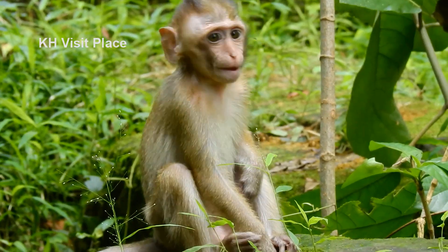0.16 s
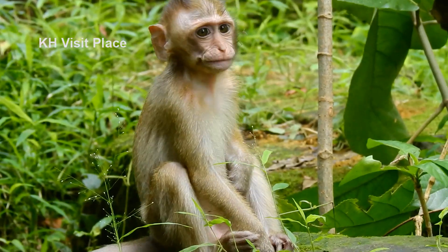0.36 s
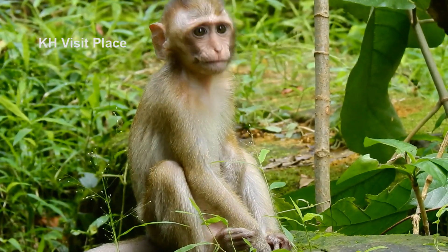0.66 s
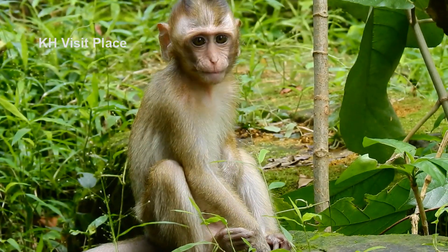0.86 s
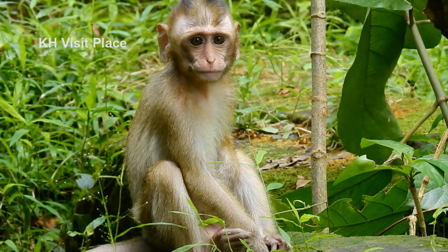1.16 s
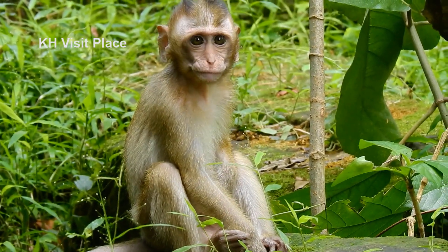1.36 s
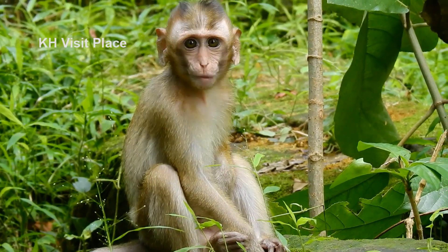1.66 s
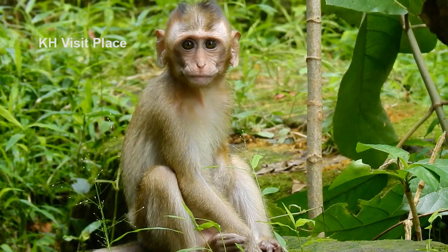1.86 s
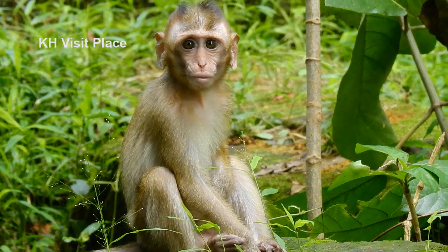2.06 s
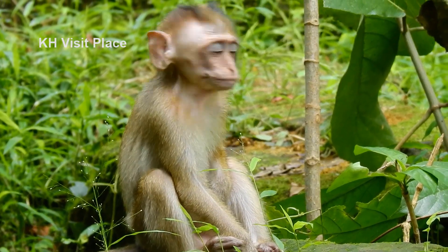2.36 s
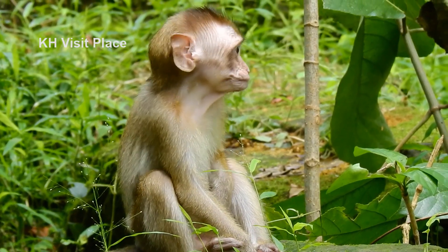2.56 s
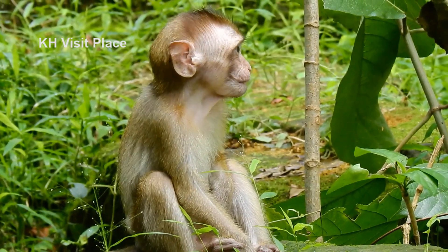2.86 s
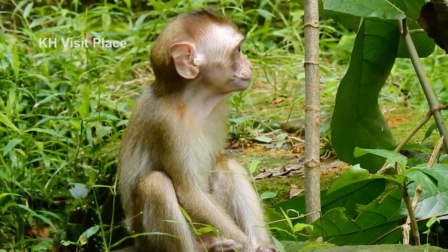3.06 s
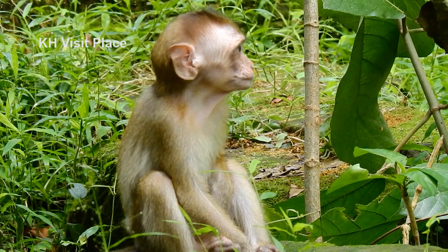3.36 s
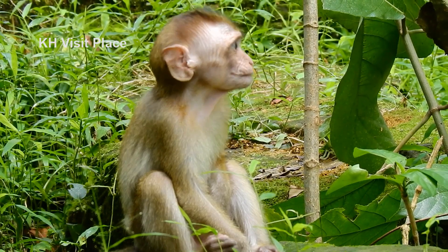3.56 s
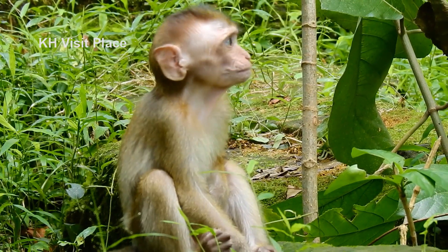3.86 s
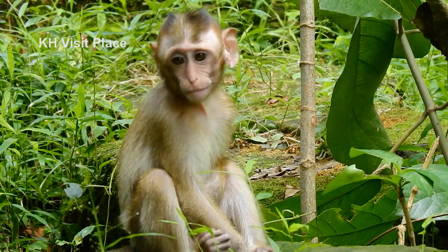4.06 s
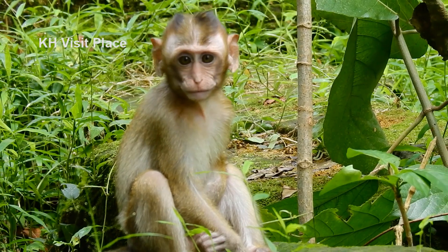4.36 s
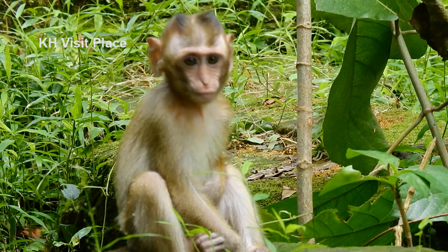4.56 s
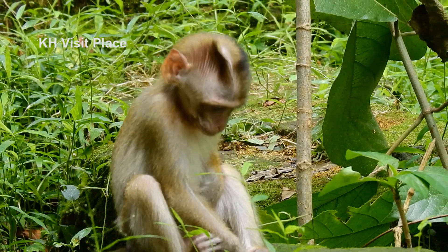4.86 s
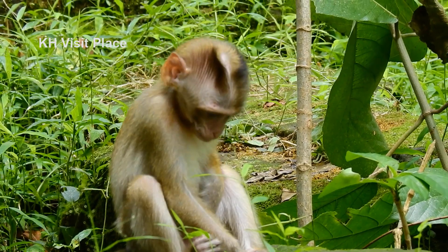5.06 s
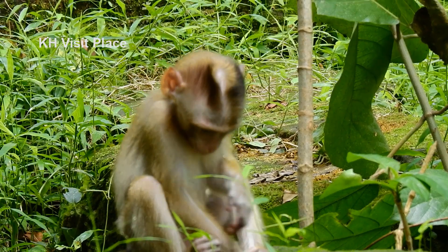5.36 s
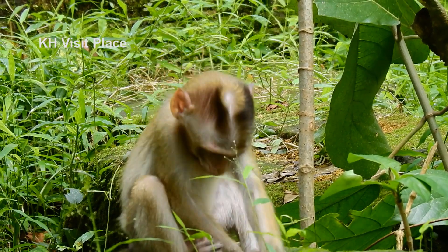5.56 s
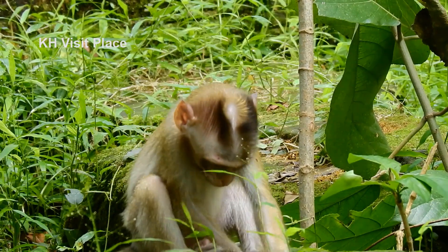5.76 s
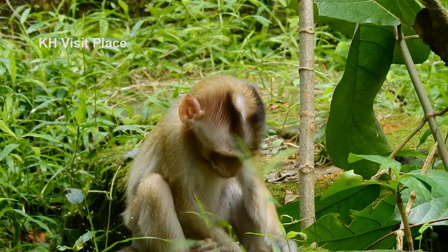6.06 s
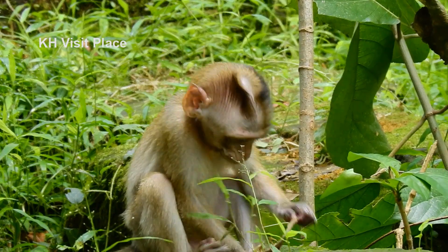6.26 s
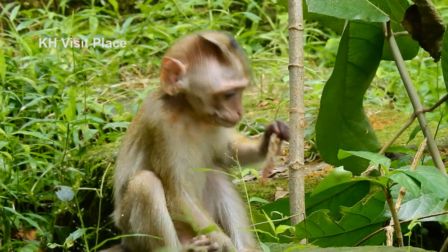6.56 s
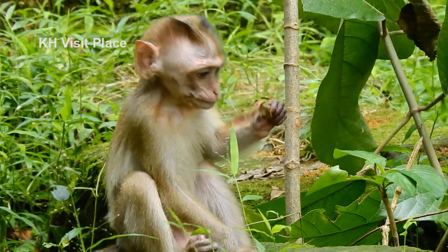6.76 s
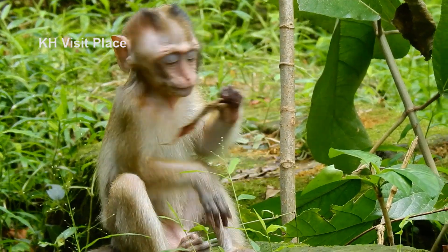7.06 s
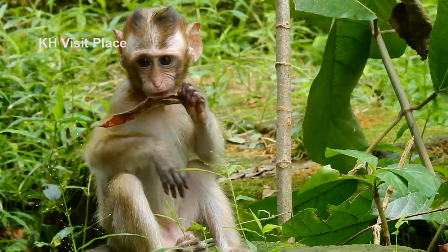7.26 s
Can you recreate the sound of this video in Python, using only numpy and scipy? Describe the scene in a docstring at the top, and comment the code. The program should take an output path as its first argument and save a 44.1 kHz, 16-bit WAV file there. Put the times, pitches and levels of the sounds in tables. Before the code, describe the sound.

Stereo camera microphone in a leafy forest clearing where a young monkey sits. A far bird gives hollow, rising strings of short whistled coos with soft woodland echoes, then repeats an octave higher. A katydid rasps very high on the left throughout. Twigs crack close by around one second, with soft thuds and rustling leaves. Faint crickets and small chirps fill in over low, distant rumble.

```python
"""A far bird's coo, already sounding, opens this forest clearing, with a katydid's rasp in threes to the left and leaves
rustling. The bird whistles rising strings of short notes, then an octave higher; small birds chirp in glides over
faint low coos, crickets trill in pulsed tones, and echoes of decaying noise answer them all. A creak, soft thuds
and leaves are filtered noise, twigs snap close by in a few sagging cycles, distant rumble throbs and a low tone
swells near the end. The forest bed is noise shaped band by band; a stereo camera microphone limits bass and top."""
import sys
import numpy as np
from scipy import signal
from scipy.fft import irfft, next_fast_len
from scipy.io import wavfile
from scipy.ndimage import uniform_filter1d, map_coordinates

SR = 44100
rng = np.random.default_rng(int(sys.argv[2]) if len(sys.argv) > 2 else 0)


def master(y):
    """Save y as 16-bit WAV."""
    cut = np.clip(np.atleast_2d(y).T, -1, 1)
    pcm = np.round(cut * 32767)  # scale
    wavfile.write(sys.argv[1], SR, pcm.astype(np.int16))


N = 326781
T = np.arange(N) / SR  # seconds

# Placed sounds take their level in dB from the mean of the left and right ports.
# Air of the clearing. Each row: time in seconds, levels in dB of the rumble, the low middle and the leaf
# rustle; each moves the bed by its departure from its own median.
AIR_LEVELS = [(0.0, -42.5, -54.5, -47), (0.2, -45.5, -49, -53), (0.6, -50, -56.5, -62),
              (0.95, -41.5, -53, -47.5), (1.19, -52, -55, -54), (1.67, -49.5, -50, -57.5),
              (2.25, -48, -57, -60.5), (2.85, -48.5, -54, -57.5), (3.63, -45.5, -54, -60.5),
              (4.33, -45, -54.5, -56.5), (4.68, -48.5, -50.5, -56.5), (4.87, -39, -53.5, -58),
              (4.91, -48.5, -53, -58.5), (5.66, -49, -56.5, -56.5), (5.94, -48, -50, -53.5),
              (6.31, -53, -56, -56.5), (6.69, -54.5, -53, -55.5), (6.93, -45, -55.5, -55.5),
              (7.41, -48.5, -49, -57)]
# Colour of the forest bed. Each row: frequency in Hz, relative density in dB per Hz.
FOREST_COLOUR = [(12, -48.5), (20, -14), (76, 3), (132, -5.5), (187, -8), (344, -14.5), (687, -20),
                 (827, -21.5), (1570, -26.5), (1890, -24), (3970, -29), (4910, -29.5), (7320, -29),
                 (9800, -38.5), (11500, -61), (15000, -58), (22000, -120)]
# Width of the bed at the microphone. Each row: frequency in Hz, left-right likeness from 0 to 1.
LIKENESS = [(60, 0.98), (250, 0.95), (700, 0.55), (1500, 0.33), (8000, 0.12)]
FOREST_RMS_DB, FLICKER_DB = -43.5, 3.0
RUMBLE_TOP_HZ, MURMUR_HZ, MURMUR_OCTAVES, LEAVES_FROM_HZ = 158, 257, 1.2, 1470

# Katydid off to the left. Each row: time in seconds, left level in dB, left minus right in dB.
KATYDID_LEVELS = [(0, -37.5, 8), (.4, -41.5, 12), (1.199, -38.5, 11), (1.65, -39.5, 19), (2.1, -38, 8),
                  (3.6, -39, 12), (4.1, -37.5, 15), (6.201, -37.5, 8), (6.7, -40, 10), (7.41, -41, 9.5)]
# Resonances of its wing. Each row: centre in Hz, width in Hz, relative level in dB.
WING_RESONANCES = [(12185, 1750, -11.5), (13440, 930, -8), (14600, 960, -1), (16120, 1700, 2)]
# Drift of its rhythm. Each row: time in seconds, lead over the steady beat in trios.
RHYTHM_LEAD = [(.15, .06), (.6, .1), (1.65, -.1), (2.55, -.09), (3.15, -.21), (3.75, -.17), (4.05, -.21),
               (5.25, -.07), (6.45, .17), (7.05, .17)]
# The three strokes of a trio. Each entry: relative level in dB.
STROKE_LEVELS = [-4.5, -2, -2.5]
TRIOS_A_SECOND = 18.9
STROKE_WIDTH, BETWEEN_DB = 0.068, -9.5  # width in trios; relative blur between strokes
KATYDID_LAG, KATYDID_ALIKE = 50, 0.5  # samples later at the right port; share common to both

# Leaves and stalks brushed, and a short creak just before the first snap. Each row: start in seconds,
# rms in dB at the burst's peak, centre in Hz, rise in seconds, fall by 60 dB in seconds.
BRUSH_BURSTS = [(0, -44.5, 5870, 0.018, 0.86), (.89, -44, 1500, 0.044, 0.22),
                (1.40, -55.5, 6740, 0.043, 0.4), (1.89, -54, 6400, 0.047, 0.82),
                (2.38, -56.5, 6240, 0.03, 0.6), (3.84, -54.5, 2730, .035, 0.39),
                (4.765, -50, 1280, 0.038, 0.29), (5.80, -48, 1340, 0.02, 0.16),
                (6.10, -53, 990, 0.036, 0.31), (6.339, -56.5, 5330, 0.046, 1.3),
                (6.653, -46.5, 833, .1, 0.05), (7.23, -59.5, 2300, .03, 0.25)]
# Soft low bursts: thuds, and the body of the second twig snap. Each row: start in seconds,
# rms in dB at the burst's peak, centre in Hz.
LOW_BURSTS = [(1.325, -40.5, 740), (1.359, -38, 263), (1.669, -40.5, 196), (2.37, -42.5, 199),
              (2.56, -39.5, 151), (2.64, -39.5, 184), (2.901, -43, 198), (4.401, -46.5, 370),
              (4.47, -42, 211)]
BRUSH_OCTAVES, LOW_OCTAVES = 0.7, 0.77
LOW_RISE_S, LOW_T60_S = 0.014, 0.17

# Far bird: its notes and their strongest echoes as they arrive. Each row: centre in seconds (a third of
# the way in for the first of a high string), peak in dB, nominal pitch in Hz, length in seconds,
# left minus right in dB.
COO_ARRIVALS = [(.022, -34.5, 931.7, 0.11, 4), (0.107, -38.5, 929, 0.063, 12), (0.177, -40, 892, 0.046, -1),
                (0.652, -34.5, 896, 0.078, 12), (0.756, -29, 895, 0.067, 8), (0.851, -34, 895, 0.075, 4),
                (.903, -33.5, 906, .05, 1), (.958, -27, 919, .055, 9), (.997, -32, 910.6, .045, 6),
                (1.051, -30, 912.6, 0.038, -3), (1.13, -41, 914, 0.072, -4), (1.18, -48, 903, 0.048, 7),
                (1.24, -50, 938, 0.055, -5), (1.695, -34.5, 895, 0.076, -3), (1.755, -41, 866, .04, -5),
                (1.798, -30, 897, 0.067, -7), (1.893, -28, 915.6, .075, -5), (1.948, -31.5, 918, 0.034, 3),
                (1.974, -29, 911.4, 0.039, 4), (1.995, -29, 910, 0.029, 7), (2.05, -37, 930, 0.049, 6),
                (2.115, -33, 927, .028, 17), (2.143, -36, 927, 0.035, 27), (2.215, -44, 916, 0.052, -5),
                (2.295, -52.5, 919, 0.053, -2), (2.745, -41.5, 870, 0.059, 7.5),
                (2.868, -31.5, 888, 0.0877, -1), (2.966, -29.5, 902, 0.068, -2),
                (3.066, -28, 899.3, .075, -2), (3.142, -33, 885, 0.033, 0), (3.174, -32, 897, 0.039, 4),
                (3.256, -42, 904, .045, 2), (3.294, -41.5, 895, 0.034, 2), (3.852, -41, 870, .07, 2),
                (3.925, -46.5, 856, .03, 3), (3.966, -30.5, 876, 0.062, 0),
                (4.062, -32.5, 894.5, 0.063, -5), (4.135, -42, 897, 0.03, 1), (4.169, -34, 912, 0.071, -2),
                (4.252, -36.5, 908.5, 0.06, -3), (4.379, -48, 893, 0.079, 2),
                (5.061, -35.5, 1800, 0.073, 9), (5.116, -37, 1817, 0.028, 9.5),
                (5.145, -45, 1800, .025, -1), (5.178, -40.5, 1790, 0.048, 4), (5.227, -30, 1803, .038, 5),
                (5.27, -35, 1812, 0.044, 1), (5.305, -47, 1786, .035, 3), (5.342, -38, 1830, 0.033, 12),
                (5.382, -39, 1814, 0.056, 14.5), (5.422, -42, 1810, 0.051, 10.5),
                (5.511, -45, 1810, 0.036, 3), (5.585, -47, 1800, 0.059, 3), (5.66, -49.5, 1800, .07, 7),
                (5.843, -28, 1805, 0.096, 19.5), (5.915, -45, 1780, .035, 9),
                (5.952, -37.5, 1766, 0.025, 11.5), (5.998, -40, 1784, .04, 10.5),
                (6.03, -25, 1838, 0.04, 4), (6.054, -36, 1904, .02, 9), (6.072, -27, 1841, 0.026, -3),
                (6.1, -31, 1880, 0.032, 17), (6.124, -30.5, 1840, 0.02345, 5),
                (6.154, -41, 1863, 0.036, 12), (6.207, -51, 1895, .03, 8), (6.31, -51, 1836, 0.033, 5.5),
                (6.365, -44, 1833, 0.028, 10)]
# Further echoes off the nearest trunks. Each row: delay in seconds, level in dB relative to the arrival,
# left minus right in dB, half the phase step between the ports in radians.
TRUNK_ECHOES = [(0.044, -8.5, 2.5, 0.5), (.14, -20, -6, -.3)]
COO_LAG = -0.7  # half the phase step between the ports for each arrival, radians
# shares of the nominal pitch: start, end, extra scoop on a first note, midway bow, rms waver
COO_FROM, COO_TO, FIRST_SCOOP, COO_ARCH, COO_WAVER = 0.94, 0.98, 0.0372, 0.0396, 0.015
PAUSE_S, HIGH_FROM_HZ = 0.25, 1300  # a longer gap opens a new string; strings above this open abruptly

# Chirps of small birds, some of their ringing echoes, and faint low coos near 620 Hz. Each row: start in
# seconds, peak in dB, first Hz, last Hz, length in seconds, left minus right in dB.
BIRD_CALLS = [(.005, -49.5, 3010, 2970, 0.087, 21), (0.096, -49.5, 2826, 2725, 0.098, 1),
              (0.163, -49.5, 2530, 2390, 0.04, -1.5), (0.196, -46.5, 6800, 5850, 0.054, 2),
              (0.79, -47.5, 619, 564, 0.24, -3), (0.961, -41, 3640, 3730, 0.021, -3),
              (1.213, -48, 3780, 3400, 0.06, -12), (1.315, -46.5, 4500, 4310, 0.058, -21),
              (1.481, -49, 4610, 4700, 0.041, -2), (1.52, -53, 4680, 5050, .028, 15),
              (3.041, -51.5, 622, 615, 0.19, -1), (3.142, -62, 3040, 3140, 0.19, 0),
              (3.585, -54, 2150, 2220, 0.033, 7), (3.545, -56, 6580, 6340, 0.083, 8.5),
              (4.51, -51, 2150, 2640, 0.036, 13), (4.536, -37.5, 2704, 2540, 0.039, -2),
              (4.569, -53, 2420, 2330, 0.15, 1), (4.573, -44, 2410, 1860, 0.037, 9),
              (4.768, -50, 2600, 2600, 0.033, -9), (4.784, -40, 2090, 2170, 0.021, 14),
              (4.799, -46, 1760, 1300, 0.024, 2), (4.802, -32.5, 2030, 2252, 0.036, 22),
              (4.84, -50.5, 2130, 2028, 0.24, 21), (4.928, -59, 620, 618, 0.28, -1),
              (5.199, -56, 624.2, 620, 0.43, -12), (5.27, -57, 3680, 3510, 0.14, 1),
              (5.327, -45, 2080, 2214, 0.0176, 8), (5.253, -52.5, 4480, 4540, 0.25, -15),
              (5.455, -47.5, 6600, 5920, 0.05, 19), (5.533, -44.5, 2440, 2800, 0.028, -5),
              (5.596, -39, 1944, 2245, 0.0266, 29), (5.62, -30, 2090, 2253, 0.026, 26),
              (5.7, -50, 2219, 2220, 0.047, 21), (5.582, -48.5, 1740, 1620, 0.084, 10),
              (5.768, -53, 5400, 5200, 0.019, 20), (5.812, -42.5, 1535, 1395, 0.032, 5),
              (5.824, -44, 1180, 1090, 0.024, 5), (5.825, -50, 5340, 5270, 0.0247, 5.5),
              (5.919, -39.5, 5150, 3470, 0.015, -6), (5.929, -48.5, 3640, 3440, 0.032, -7),
              (6.017, -53.5, 3560, 3870, 0.053, -13), (6.072, -55.5, 4730, 4600, .06, -5),
              (6.124, -53, 3700, 3720, 0.042, -9.5), (6.147, -57.5, 4050, 3880, .07, -14),
              (6.137, -46.5, 1963, 1997, 0.089, 4), (6.595, -58, 1720, 1690, .05, 3.5),
              (6.634, -55, 1950, 2370, 0.041, 7), (6.67, -59, 2300, 2350, .04, 6),
              (6.94, -54, 2290, 2260, .035, 5), (7.013, -65, 1940, 1900, 0.031, 7),
              (7.106, -52, 1964, 1840, 0.036, 14), (7.238, -50, 2490, 2640, .03, 5),
              (7.27, -56, 2110, 2040, 0.094, 9), (7.233, -52.5, 6190, 6120, 0.092, 0.5)]
# Reverberation: fall by 60 dB and rise in seconds, and the level sent into it in dB
TREES_T60_S, TREES_RISE_S, COO_ECHO_DB, SNAP_ECHO_DB = 0.96, 0.012, -5.5, -28
BUSHES_T60_S, BUSHES_RISE_S, BUSHES_DB = 0.45, 0.0012, -2.5

# Crickets. Each row: start in seconds, level in dB before pulsing, pitch in Hz, length in seconds,
# pulses a second, left minus right in dB.
CRICKET_TRILLS = [(0.235, -46.5, 6380, 0.13, 65, 3), (0.194, -51.5, 4915, 0.44, 36, 1.5),
                  (1.142, -59, 9100, 0.25, 55, 3.5), (2.91, -56.5, 4950, 0.3, 33, -1.5),
                  (3.113, -60.5, 7150, 0.324, 35, -2.5), (3.527, -55.5, 9600, 0.12, 58, 0),
                  (3.559, -58.5, 6250, 0.2, 59, 37), (4.084, -51, 2590, 0.38, 35, -5),
                  (4.249, -54, 4980, 0.64, 35.2, 3), (5.096, -46.5, 2570, 0.28, 39, -6),
                  (5.466, -52.5, 6450, 0.25, 68, 13), (6.482, -51, 4950, 0.53, 48, -3),
                  (7.263, -48, 6340, 0.14, 63, 9)]

# Twigs close by. Each row: start in seconds, peak in dB, first Hz, last Hz, swell in seconds,
# tick rms at its onset in dB, tick Hz, left minus right in dB, splinter reference level in dB.
TWIG_SNAPS = [(.9336, -10, 1580, 1050, .0011, -27, 3500, -1, -32),
              (1.3398, -29, 1050, 900, .0008, -48, 2200, -1, -52),
              (1.3482, -15.5, 1030, 930, .0008, -39, 2500, -1, -43),
              (1.3691, -13.5, 880, 600, .0006, -37, 3200, 0, -45),
              (1.4862, -46, 1800, 1800, .0004, -34.5, 7600, -2, -60)]
# Splinters after each snap. Each row: share of the snap's first Hz, level in dB relative to its splinter
# reference, width in octaves, rise in seconds, fall by 60 dB in seconds.
SPLINTER_BURSTS = [(0.381, 8, 1.2, 0.00067, 0.068), (1.0, -3, 1.8, 0.00058, 0.15),
                   (3.2, -12, 0.68, 0.0016, 0.38)]
SNAP_SAG_S, SNAP_FADE_S, TICK_FADE_S = 0.001, 0.0013, 0.0012

# Low throbs in the distant rumble, like a far motor under load. Each row: centre in seconds, peak in dB, Hz.
RUMBLE_THROBS = [(3.22, -37, 130), (3.347, -35, 120), (3.39, -36.5, 110), (3.433, -32, 111),
                 (3.482, -31, 115), (3.525, -29, 126), (3.574, -29.5, 120), (3.621, -35, 111),
                 (3.716, -36, 110), (3.857, -31, 125), (3.987, -34, 105), (4.015, -31, 120),
                 (4.305, -37, 110), (4.852, -30, 95), (4.876, -37, 110)]
THROB_CYCLES = 0.48  # from the centre until the swell has fallen to 1/e
# Low hum near the end. One row: start in seconds, peak in dB, pitch in Hz, length in seconds.
LOW_HUM = (7, -46, 200, 1.9)

MIC_LOW_HZ, MIC_TOP_HZ = 42.3, 15780


def undb(db):
    """Decibels to amplitude."""
    return 10 ** (np.asarray(db) / 20)


def unit(x):
    """Scales to rms 1."""
    return x / np.sqrt(np.mean(x ** 2))


def walk(rate):
    """Random levels held 1 / rate s and smoothed twice, rms 1."""
    hold = int(SR / rate)
    steps = np.repeat(rng.standard_normal(N // hold + 1), hold)
    return unit(uniform_filter1d(uniform_filter1d(steps, hold), hold)[:N])


def band(hz, width_hz):
    """Two unrelated noises in a bell-shaped band, rms 1."""
    size = next_fast_len(N)
    bell = np.exp(-2 * ((np.fft.rfftfreq(size, 1 / SR) - hz) / width_hz) ** 2)
    real, imaginary = rng.standard_normal((2, 2, len(bell)))
    return unit(irfft(bell * (real + 1j * imaginary), size)[:, :N])


def bandpass(order, low_hz, high_hz, x):
    """Butterworth band-pass."""
    return signal.sosfilt(signal.butter(order, [low_hz, high_hz], "band", fs=SR, output="sos"), x)


def decay(t, t60):
    """Exponential fall by 60 dB in t60 seconds."""
    return np.exp(-np.log(1000) * t / t60)


def along_pitch(hz, table):
    """Reads a table of (Hz, value) on a logarithmic frequency axis."""
    table_hz, values = np.transpose(table)
    return np.interp(np.log(hz), np.log(table_hz), values)


def add(out, s, sound, db, pan_db, lag=0.):
    """Places an analytic sound between left and right; lag is half the phase step between the ports."""
    first = int(s * SR)
    i = max(first, 0)
    sound = sound[i - first:][:N - i]
    gains = undb(np.array([[pan_db], [-pan_db]]) / 2)
    ports = gains * np.exp(1j * lag * np.array([[1], [-1]]))
    out[:, i:i + len(sound)] += np.real(sound * ports) * undb(db) / abs(ports.mean())


def whistle(first_hz, last_hz, length, blur_hz=0., skew=0.58, arch_hz=0., edge=1.4):
    """A gliding, bowing, wavering note; skew under 1 quickens the attack, a small edge holds the level."""
    u = (np.arange(int(length * SR)) / (length * SR)) ** skew
    noise = rng.standard_normal(len(u))
    waver = blur_hz * unit(uniform_filter1d(uniform_filter1d(noise, size=90), size=90))
    arch = np.sin(np.pi * u)
    hz = first_hz + (last_hz - first_hz) * u + arch_hz * arch + waver
    return arch ** edge * np.exp(2j * np.pi * np.cumsum(hz) / SR)


def forest():
    """Noise whose third-octave bands flicker alone; bass, low middle and treble follow their own levels."""
    frames = dict(nperseg=2048, noverlap=1536)
    hz, t, (mid, side) = signal.stft(rng.standard_normal((2, N)), SR, **frames)
    hz = np.maximum(hz, 10)[:, None]
    s, *levels = np.transpose(AIR_LEVELS)
    rumble, murmur, leaves = [np.interp(t, s, level - np.median(level)) for level in levels]
    db = along_pitch(hz, FOREST_COLOUR)
    db = db + rumble / (1 + (hz / RUMBLE_TOP_HZ) ** 4)
    db = db + murmur * np.exp(-(np.log2(hz / MURMUR_HZ) / MURMUR_OCTAVES) ** 2)
    db = db + leaves / (1 + (LEAVES_FROM_HZ / hz) ** 2)
    # random levels on a grid of third octaves and eighths of a second
    patches = rng.standard_normal((40, 80))
    grid = np.broadcast_arrays(3 * np.log2(hz / 10), 8 * t)
    flicker = map_coordinates(patches, grid, order=1)
    alike = np.clip(along_pitch(hz, LIKENESS), 0, 1)
    signs = np.array([1, -1])[:, None, None]
    both = np.sqrt(1 + alike) * mid + np.sqrt(1 - alike) * side * signs
    out = signal.istft(both * undb(db + FLICKER_DB * flicker), SR, **frames)[1][:, :N]
    return unit(out) * undb(FOREST_RMS_DB)


def katydid():
    """Three wing strokes and a rest; each stroke is a noisy rasp through the wing's resonances."""
    s, level_db, pan_db = np.transpose(KATYDID_LEVELS)
    beat = TRIOS_A_SECOND * T + np.interp(T, *np.transpose(RHYTHM_LEAD))
    # every stroke varies in force by about 1 dB
    force = undb(1.0 * rng.standard_normal((int(beat.max()) + 2, 3)))[beat.astype(int)]
    power = undb(2 * BETWEEN_DB)
    for k, db in enumerate(STROKE_LEVELS):
        stroke = np.exp(-((beat % 1 - (k + 1) / 4) / STROKE_WIDTH) ** 2)
        power = power + undb(2 * db) * force[:, k] ** 2 * stroke
    rasp = sum(undb(db + walk(13)) * band(hz, width_hz) for hz, width_hz, db in WING_RESONANCES)
    common = np.roll(rasp[0], KATYDID_LAG)
    rasp[1] = KATYDID_ALIKE * common + np.sqrt(1 - KATYDID_ALIKE ** 2) * rasp[1]
    right_db = np.outer([0, -1], np.interp(T, s, pan_db))
    return unit(np.sqrt(power) * rasp) * undb(np.interp(T, s, level_db) + right_db)


def rustles():
    """Leaves, creak, low bursts and splinters: grainy bursts of noise, low ones alike left and right."""
    out, t = np.zeros((2, N)), T[:int(.6 * SR)]
    bursts = [(s, db, hz, BRUSH_OCTAVES, rise, t60) for s, db, hz, rise, t60 in BRUSH_BURSTS]
    bursts += [(s, db, hz, LOW_OCTAVES, LOW_RISE_S, LOW_T60_S) for s, db, hz in LOW_BURSTS]
    for s, _, hz, *_, db in TWIG_SNAPS:
        bursts += [(s, db + rel_db, share * hz, *shape) for share, rel_db, *shape in SPLINTER_BURSTS]
    for s, db, hz, octaves, rise, t60 in bursts:
        # cubing the noise makes it grainy
        grains = rng.standard_normal((2, len(t))).clip(-2.5, 2.5) ** 3
        mid, side = bandpass(2, hz * 2 ** (-octaves / 2), hz * 2 ** (octaves / 2), grains)
        shape = (1 - np.exp(-t / rise)) ** 2 * decay(t, t60)
        # real part: both ports alike; imaginary part: turned into their difference by the lag
        noise = (mid + 1j * side * min(hz / 2000, 1)) / mid.std()
        add(out, s, noise * shape / shape.max(), db, 0, np.pi / 4)
    return out


def coos():
    """Each arrival, a note or a strong echo, scoops up a little and returns from the nearest trunks."""
    out = np.zeros((2, N))
    opens = np.diff(np.array(COO_ARRIVALS)[:, 0], prepend=0) > PAUSE_S
    for (s, db, hz, length, pan_db), first in zip(COO_ARRIVALS, opens):
        sharp = first and hz > HIGH_FROM_HZ
        from_hz = (COO_FROM - first * FIRST_SCOOP) * hz
        coo = whistle(from_hz, COO_TO * hz, length, blur_hz=COO_WAVER * hz,
                      skew=1 - 0.46 * sharp, arch_hz=COO_ARCH * hz, edge=1.21)
        start = s - length * (.5 - .17 * sharp)
        add(out, start, coo, db, pan_db, COO_LAG)
        for delay, echo_db, echo_pan_db, lag in TRUNK_ECHOES:
            add(out, start + delay, coo, db + echo_db, echo_pan_db, lag)
    return out


def birds():
    """Chirps, some of their ringing echoes and faint low coos: gliding tones with a fast waver of pitch."""
    out = np.zeros((2, N))
    for s, db, first_hz, last_hz, length, pan_db in BIRD_CALLS:
        blur_hz = min(70, 0.025 * first_hz)
        call = whistle(first_hz, last_hz, length, blur_hz=blur_hz, skew=0.802, edge=0.87)
        add(out, s, call, db, pan_db, .6)
    return out


def echoes(dry, t60, rise):
    """Scattered echoes from trunks and leaves: decaying noise, different at each side."""
    t = T[:SR]
    tail = rng.standard_normal((2, len(t))) * decay(t, t60) * (1 - np.exp(-t / rise))
    tail /= np.sqrt(np.sum(tail ** 2, axis=1, keepdims=True))
    return signal.oaconvolve(dry.mean(axis=0, keepdims=True), tail, axes=1)[:, :N]


def crickets():
    """A blurred wing tone chopped into pulses."""
    out = np.zeros((2, N))
    for s, db, hz, length, rate, pan_db in CRICKET_TRILLS:
        tone = whistle(hz, hz, length, blur_hz=max(65, .018 * hz), skew=.8, edge=1.2)
        pulses = 0.71 + 0.36 * np.cos(2 * np.pi * rate * T[:len(tone)])
        add(out, s, tone * pulses, db, pan_db, .7)
    return out


def twigs():
    """A few cycles of the wood that swell, sag in pitch and die, and a dry tick as it breaks."""
    out, t = np.zeros((2, N)), T[:SR // 50]
    for s, db, first_hz, last_hz, swell, tick_db, tick_hz, pan_db, _ in TWIG_SNAPS:
        late = np.maximum(t - 1.5 * swell, 0)  # seconds past the peak
        shape = np.exp(-np.minimum(t / swell - 1.5, 0) ** 2 - late / SNAP_FADE_S)
        hz = last_hz + (first_hz - last_hz) * np.exp(-late / SNAP_SAG_S)
        add(out, s, shape * np.sin(2 * np.pi * np.cumsum(hz) / SR), db, pan_db)
        crack = bandpass(1, .7 * tick_hz, 1.4 * tick_hz, rng.standard_normal(len(t)))
        add(out, s + swell, unit(crack) * np.exp(-t / TICK_FADE_S), tick_db, pan_db)
    return out


def throbs():
    """Each throb is about one cycle of pressure, the same left and right."""
    out, t = np.zeros((2, N)), T[:SR // 25] - 1 / 50
    for s, db, hz in RUMBLE_THROBS:
        swell = np.exp(-(t * hz / THROB_CYCLES) ** 2)
        phase = 2 * np.pi * hz * t + np.pi * rng.random()
        add(out, s + t[0], swell * np.exp(1j * phase), db, 0)
    return out


def hum():
    """A wavering low tone, the same left and right."""
    out = np.zeros((2, N))
    s, db, hz, length = LOW_HUM
    add(out, s, whistle(hz, hz, length, blur_hz=40.4), db, 0)
    return out


def scene():
    """The whole clearing: near and far sources, their echoes and the forest bed."""
    coo, small, near = coos(), birds() + crickets(), twigs()
    to_trees = undb(COO_ECHO_DB) * coo + undb(SNAP_ECHO_DB) * near
    trees = echoes(to_trees, TREES_T60_S, TREES_RISE_S)
    bushes = echoes(undb(BUSHES_DB) * small, BUSHES_T60_S, BUSHES_RISE_S)
    sources = coo + small + near + rustles() + katydid() + throbs() + hum()
    return sources + trees + bushes + forest()


def record(dry):
    """The camera microphone thins the deep bass and cuts the top."""
    thin = signal.sosfilt(signal.butter(2, MIC_LOW_HZ, "high", fs=SR, output="sos"), dry)
    return signal.sosfilt(signal.ellip(12, .2, 75, MIC_TOP_HZ, fs=SR, output="sos"), thin)


dry = scene()
out = record(dry)
master(out)
```